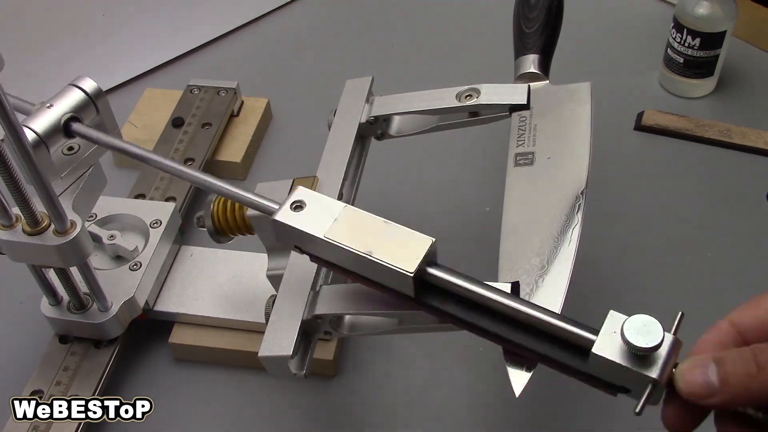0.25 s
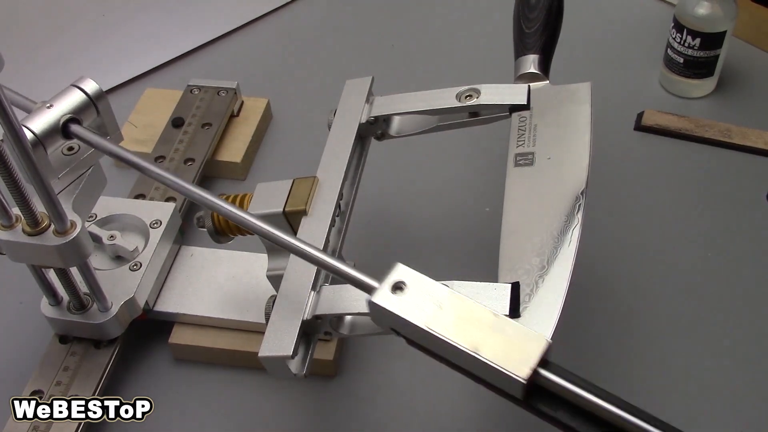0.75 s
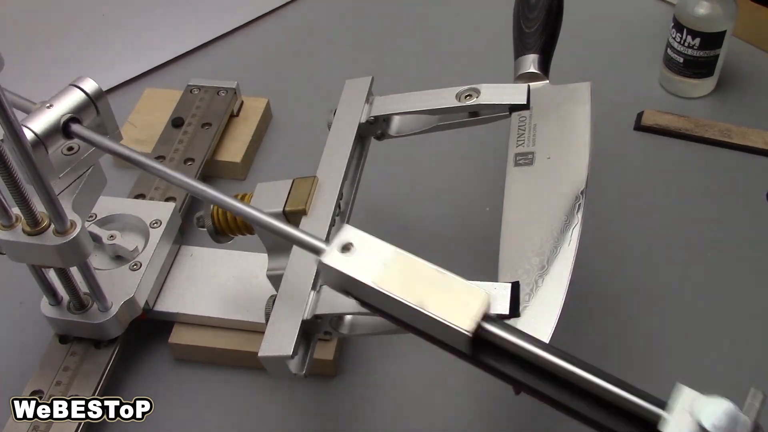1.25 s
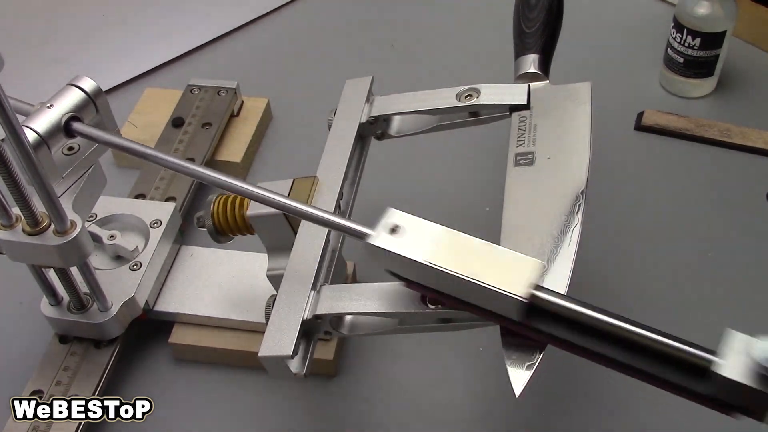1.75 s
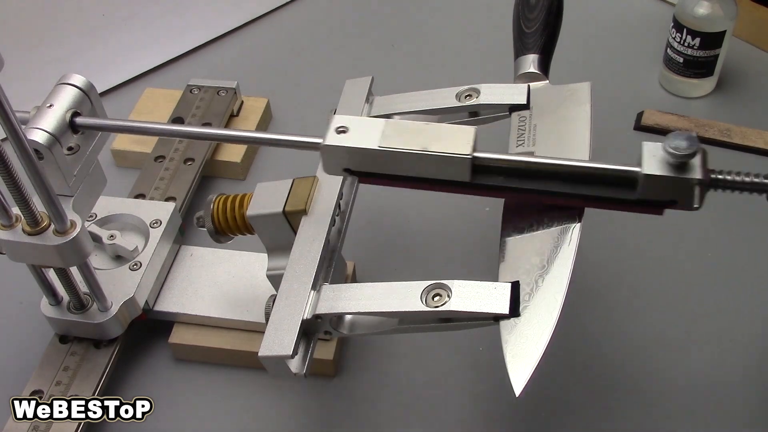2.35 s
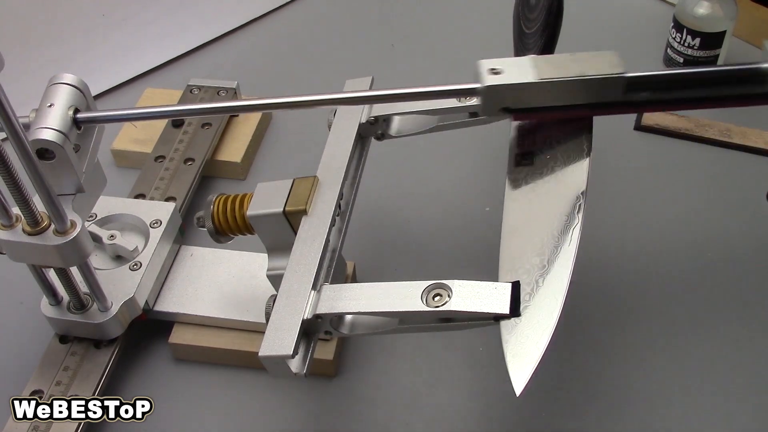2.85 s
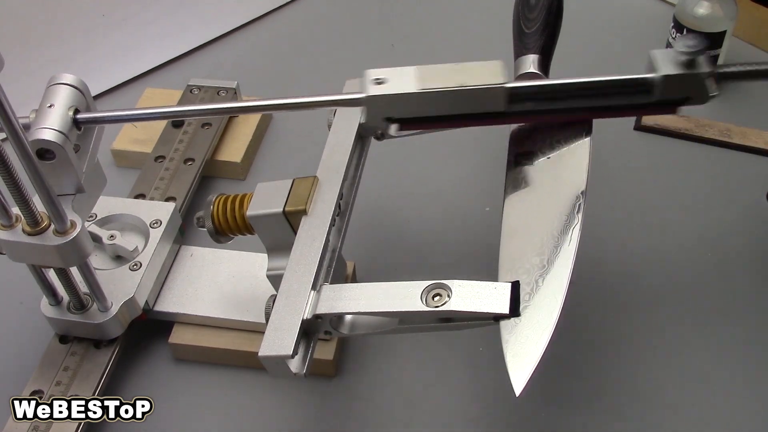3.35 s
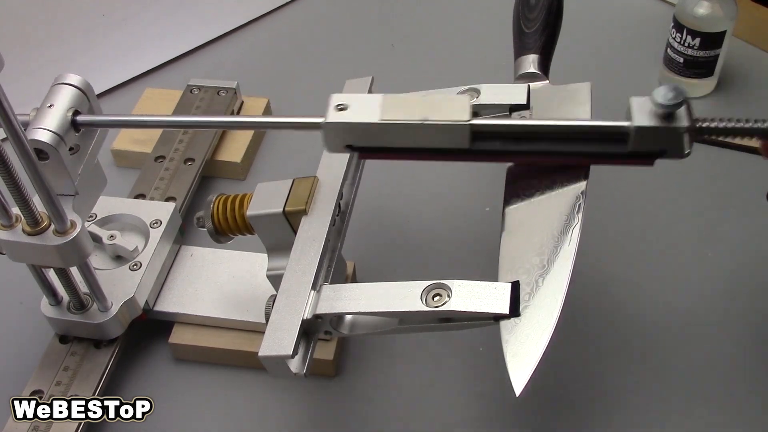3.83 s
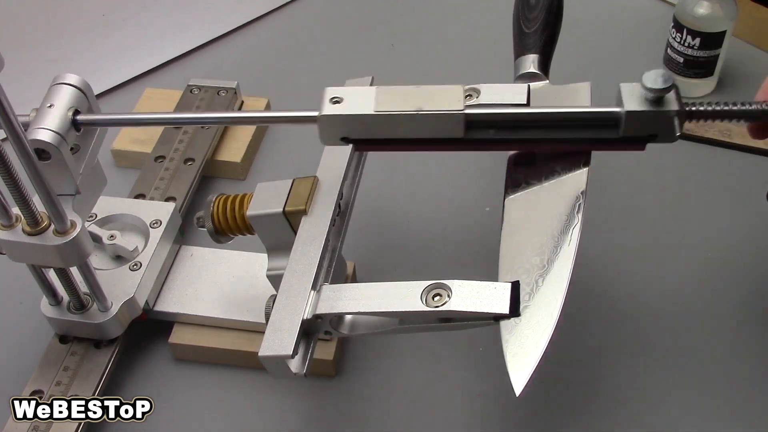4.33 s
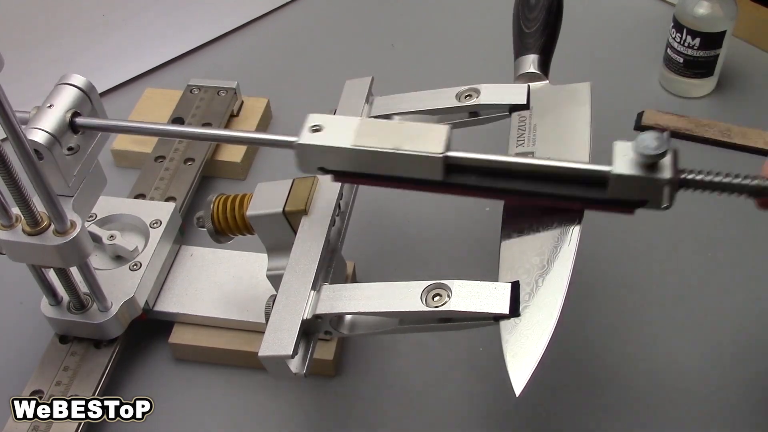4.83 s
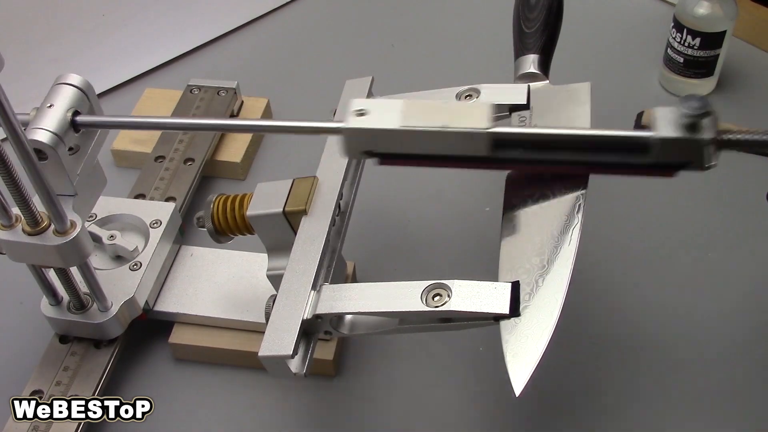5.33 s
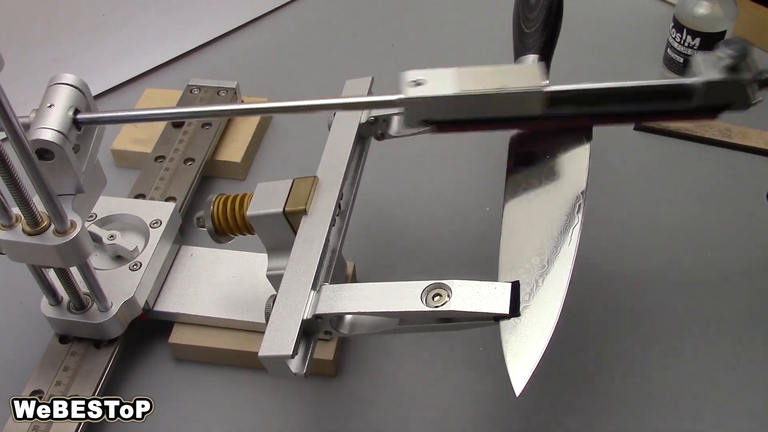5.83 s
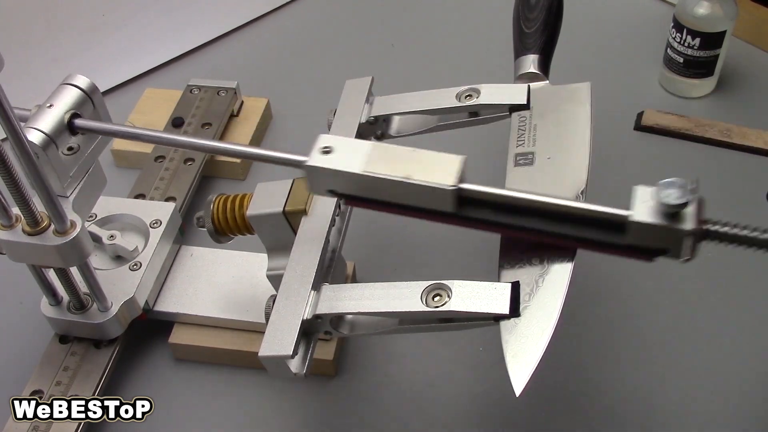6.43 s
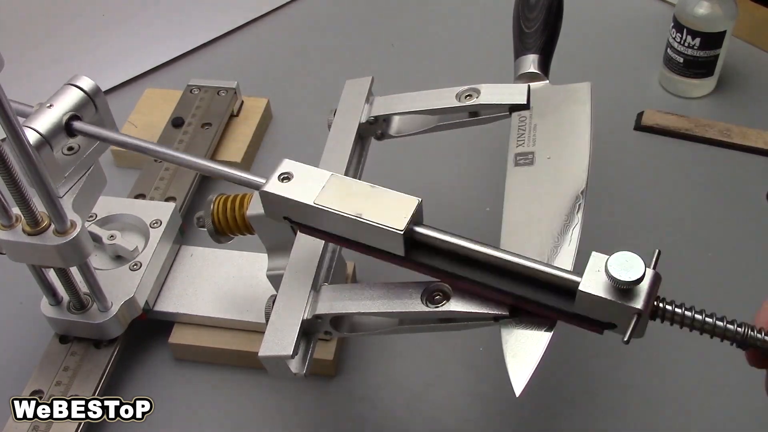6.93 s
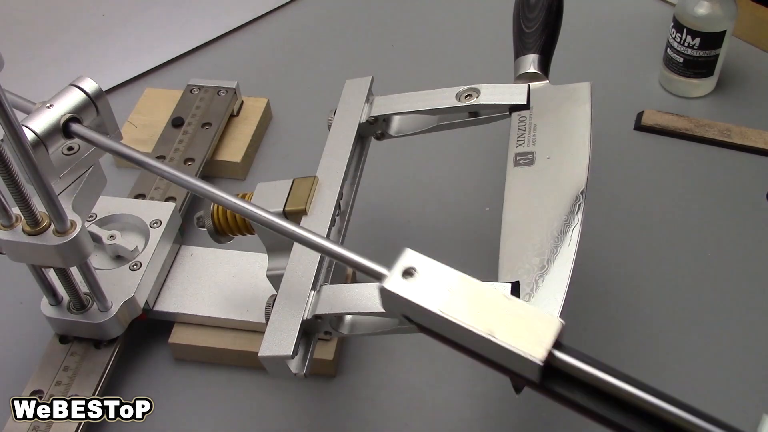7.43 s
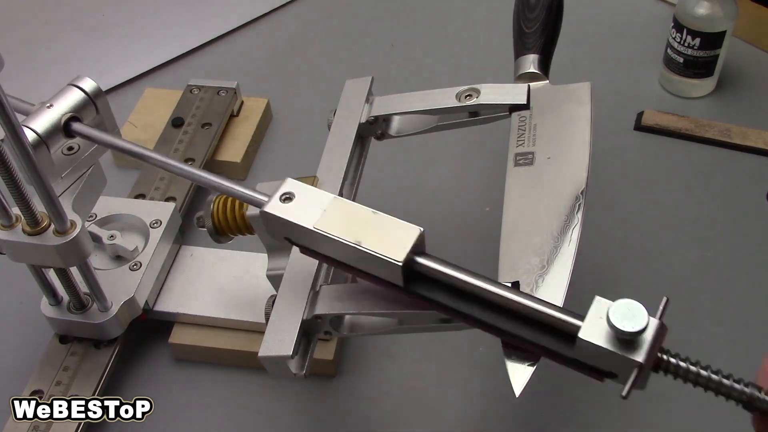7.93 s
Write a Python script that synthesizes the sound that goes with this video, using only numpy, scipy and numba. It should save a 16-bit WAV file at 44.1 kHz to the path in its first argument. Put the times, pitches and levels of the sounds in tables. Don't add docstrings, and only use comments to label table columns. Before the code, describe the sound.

Fast abrasive strokes on a knife blade, heard close and nearly dry. Each push and pull gives a short swell of sharp gritty hiss, the metal holder and clamp ringing underneath. After a tiny pause near the start the rubbing continues steadily to the end, changing from brighter and squealier to thinner tones as the stone wanders along the blade. Sharp little snags stand out, over faint room noise and tiny rapid ticks.

```python
import sys
import numpy as np
from scipy import signal
from scipy.fft import rfft, irfft, next_fast_len
from scipy.io import wavfile
from scipy.ndimage import uniform_filter1d
from numba import njit

SR = 44100
rng = np.random.default_rng(int(sys.argv[2]) if len(sys.argv) > 2 else 0)


def unload_wav(signal):
    wavfile.write(
        sys.argv[1],
        SR,
        np.round(np.clip(np.atleast_2d(signal).T, -1, 1) * 32767).astype(np.int16),
    )


def voltage_ratio(level):
    return 10 ** (np.asarray(level, float) / 20)


N = 360284
STEP = 32

# [t/s, peak level/dB, how far the stone is held back just before/dB]
CATCH_EVENTS = [(0.2675, -17, 2), (0.819, -26, 2), (0.98, -36, 0), (1.5877, -26, 5), (1.645, -30, 5),
                (1.935, -30, 4), (2.08, -21, 0), (2.2927, -30, 2), (2.378, -28, 6), (2.4294, -24, 3),
                (3.0904, -14.5, 6), (4.005, -28, 5), (5.696, -30, 5), (7.2489, -26, 6)]


def blade_hiss(rough):
    # [f/Hz, width/Hz, level/dB, gain toward the far end of the stone/dB]
    rod_modes = [(3250, 90, -9, 0), (3676, 31, 0, 0), (4890, 160, -3, 6), (4580, 2080, -7, 0)]
    squeal_mode = (4500, 130, 1.5, 0.4)
    holder_modes = [(6430, 230, 2, -6.5), (6896, 450, 0.5, -3), (8060, 1700, -6, 1.5)]
    blade_modes = [(9380, 400, 4.5, -5), (9940, 4900, -2, 0.5)]
    belly_mode = (10961, 289, 1, 2)
    edge_modes = [(14450, 410, 2, 0.36), (13700, 1200, -17, -1.4), (15300, 560, -9, 0)]

    top_s, rise, fall = humps(push=(.49, .355, .35), pull=(.53, .375, .335))
    edge_humps = humps(push=(.53, .22, .2), pull=(.46, .22, .24))
    squeal_db, belly_db, _, _ = along_knife()
    zing_db, zing_shift = zing()
    bite = catches()

    holder_db = answer(-8.1, 5.5, -2.5, 1.4) + .3 * np.interp(top_s, slow_time(), squeal_db)
    blade_db = answer()
    edge_db = answer(-3.3, 6.9, 1.0, 2.5)

    holder_force = rough * swells(top_s, rise, fall, holder_db, shape=3.2) + bite / 2
    holder = body(holder_force, holder_modes, wander_db=3.0, sag=0.018)

    blade_force = rough * swells(top_s, rise, fall, blade_db, shape=3.7) + bite
    blade = body(blade_force, [belly_mode, *blade_modes], wander_db=2.5, lifts_db=[belly_db])

    edge_force = rough * swells(*edge_humps, edge_db, shape=1.5) + bite / 2
    edge = body(edge_force, edge_modes, wander_db=4.0, sag=.045)

    drag = swells(top_s, 0.95 * rise, 0.95 * fall, (holder_db + blade_db) / 2 - 5, shape=2.23)
    rod = body(rough * drag + 0.33 * bite, [squeal_mode, *rod_modes], wander_db=3.5,
               lifts_db=[squeal_db + zing_db], sag=0.01, glide=.022 * travel() + zing_shift)
    return band(holder, 6420, 7600) + band(blade, 8000, 15000) + band(edge, 11500, 18500) + band(rod, 2540, 6700)


def zing():
    # [middle t/s, half length/s, level/dB, pitch shift/share]
    spells = [
        (2.03, .04, 8, .01),
        (2.45, .04, 3, .02),
        (3.2, .13, 8, .085),
        (5.08, .17, 5, .03),
        (6.12, .13, 4, .02),
        (7.04, .1, 4, .02),
    ]
    s, half, level_db, shift = np.transpose(spells)
    bell = np.exp(-((slow_time()[:, None] - s) / half) ** 4)
    return bell @ level_db, bell @ shift


def frame_hum(rough):
    # [f/Hz, width/Hz, level/dB, gain toward the far end of the stone/dB]
    base_modes = [(370, 30, -28, 0), (525.8, 41.4, 2, 1), (629, 19, -12, 3.5), (741, 15.5, -7, -5)]
    frame_modes = [(2343, 51, 1, 4.5), (795, 58, -6, 0), (1066, 37.5, 5, -6.5), (1130.4, 36, 0.5, -1),
                   (1317, 86, -2, -2.5), (1652, 130, -1, 2.5), (1821, 80, -3.5, 3), (2614, 56, -1, 1.5),
                   (2880, 21, -29, -4)]
    tipward_db = [-3, -8, 3, 3.5, 0, -3.5, 0, 3.5]

    _, _, sway_db, tip = along_knife()
    pushing = uniform_filter1d(np.sign(np.gradient(travel())), size=12)
    load_humps = humps(push=(.62, .33, .33), pull=(.44, .27, .49))
    sway_humps = humps(push=(.66, .3, .33), pull=(.42, .24, .42))

    force = rough * swells(*load_humps, answer(0.8, 5, 5.1, 2.8), shape=2.7)
    lifts_db = [gain_db * (tip - .4) for gain_db in tipward_db]
    lifts_db[0] = lifts_db[0] + 1.8 * pushing
    frame = body(force * voltage_ratio(-2.3) + 0.16 * catches(), frame_modes, wander_db=1.5, lifts_db=lifts_db, shared=True)

    sway = rough * swells(*sway_humps, answer(-0.2, 7, 8.5, 0.3), shape=2.7)
    sway = sway * fill(voltage_ratio(sway_db + 1.36 * pushing))
    base = body(sway, base_modes, wander_db=1.26, shared=True)

    frame = steadied(band(frame, 930, 3250), force, share=.6)
    base = steadied(band(band(base, 375, 1020), 252, 2100), sway, share=.7)
    return frame + base


def steadied(sound, force, share):
    heard, given = (uniform_filter1d(v ** 2 / np.mean(v ** 2), size=SR // 14) + .05 for v in (sound, force))
    return sound * (given / heard) ** (share / 2)


def grit():
    bites = (rng.random(N) < 60 / SR) * rng.uniform(.1, .7, N)
    start, length, _ = strokes()
    chance = rng.standard_normal((len(start), 2))
    grip_s = start + (.3 + .04 * chance[:, 0]) * length
    grips = np.clip(grip_s * SR, 0, N - 1).astype(int)
    bites[grips] = .6 * voltage_ratio(2.2 * chance[:, 1])
    ease_s = .004
    eased = signal.lfilter([1], [1, -np.exp(-1 / (ease_s * SR))], bites + 1e-18)
    rough = fill(voltage_ratio(.8 * drift(120))) * (1 + eased)
    return rough / np.sqrt(uniform_filter1d(rough ** 2, size=SR // 16))


def catches():
    kicks = np.zeros(N)
    for s, level_db, _ in CATCH_EVENTS:
        kicks[round(s * SR)] = voltage_ratio(level_db - 15)
    decay_s = 0.0019
    return signal.lfilter([1], [1, -np.exp(-1 / (decay_s * SR))], kicks + 1e-18)


def held_back():
    t, held_s = np.arange(N) / SR, .022
    return voltage_ratio(-sum(held_db * ((t > s - held_s) & (t < s)) for s, _, held_db in CATCH_EVENTS))


def strokes():
    turns_s = [-.022, .473, .851, .955, 1.04, 1.273, 1.554, 2.062, 3.205, 3.658, 4.558, 6.02, 6.817, 7.144,
               7.362, 8.19]
    strokes_done = [0, 9, 16, 16, 17, 20, 24, 31, 47, 53, 64, 81, 90, 94, 97, 109]
    number = np.arange(strokes_done[-1])
    start = np.interp(number + 1e-6, strokes_done, turns_s)
    end = np.interp(number + 1 - 1e-6, strokes_done, turns_s)
    return start, end - start, number % 2 - .5


def humps(push, pull):
    start, length, way = strokes()
    top, rise, fall = np.where(way > 0, np.transpose([push]), np.transpose([pull])) * length
    return start + top, rise, fall


def answer(offset_db=0, tip_db=0, push_heel_db=0, push_tip_db=0):
    # [t/s, pressure as blade level/dB, push over pull/dB]
    hand = [(0.0, -39.4, 0.4), (0.3, -36.6, 0.3), (0.75, -38.9, -1.3), (0.83, -43.3, -1.4),
            (1.0, -46.3, 0.9), (1.1, -41.5, -3.2), (1.95, -40.8, 1.5), (2.1, -42.7, -6.4),
            (2.25, -43.8, -6.4), (2.45, -40.9, -1.7), (2.8, -40.0, -3.5), (3.2, -40.4, -0.1),
            (3.8, -38.9, -1.5), (4.8, -40.7, -0.6), (6.0, -40.1, -0.8), (6.75, -43.7, -0.0),
            (7.1, -42.1, 0.8), (8.17, -42.2, -1.9)]
    # [t/s, level/dB]
    odd_strokes = [
        (.33, 2.5),
        (1.66, 2.5),
        (1.73, -3),
        (1.81, -2.5),
        (1.88, 1.5),
        (5.46, 1.8),
        (7.74, -2.5),
    ]
    start, length, way = strokes()
    s, pressure_db, push_db = np.transpose(hand)
    middle = start + length / 2
    tip = np.interp(middle, slow_time(), along_knife()[3])
    effort_db = np.interp(middle, s, pressure_db)
    lean_db = np.interp(middle, s, push_db) + push_heel_db + (push_tip_db - push_heel_db) * tip
    odd_db = sum(level_db * (abs(middle - at) < length / 2) for at, level_db in odd_strokes)
    uneven_db = .4 * rng.standard_normal(len(way))
    return effort_db + odd_db + offset_db + tip_db * tip + way * lean_db + uneven_db


def travel():
    start, length, way = strokes()
    times = np.c_[start, start + .999 * length].ravel()
    return np.interp(slow_time(), times, np.c_[-2 * way, 2 * way].ravel())


def along_knife():
    # [t/s, rod squeal/dB, belly mode/dB, base sway against frame/dB, place/heel 0 to tip 1]
    place = [
        (0.0, -5.2, -8.0, -7.3, 0.5),
        (1.0, -4.9, -8.0, -4.7, 0.9),
        (1.9, 1.7, 2.0, -11.4, 0.58),
        (2.4, 7.2, 4.5, -9.7, 0.0),
        (3.4, -3.9, -1.0, -8.9, 0.15),
        (4.6, 2.1, 4.5, -9.7, 0.08),
        (5.8, 3.0, 4.5, -11.3, 0.3),
        (6.8, 6.5, 4.5, -8.5, 0.38),
        (7.3, 4.3, -2.0, -8.6, 0.72),
        (8.17, -11.1, -7.0, -5.4, 1.04),
    ]
    s, *columns = np.transpose(place)
    return [np.interp(slow_time(), s, c) for c in columns]


def swells(times, rises, falls, levels_db, shape):
    t = slow_time()[:, None] - times
    fade_db = np.minimum(10 * np.abs(t / np.where(t < 0, rises, falls)) ** shape, 120)
    return fill(np.sqrt(np.sum(voltage_ratio(levels_db - fade_db) ** 2, axis=1)))


def body(force, modes, wander_db, lifts_db=(), sag=0, glide=0, shared=False):
    out, lifts_db, place = 0, list(lifts_db) + [0] * len(modes), travel()
    noise = rng.standard_normal(N)
    for (hz, width_hz, level_db, tilt_db), lift_db in zip(modes, lifts_db):
        if not shared:
            noise = np.roll(noise, SR // 3)
        gain = fill(voltage_ratio(level_db + lift_db + tilt_db * place + wander_db * flutter(30)))
        out = out + mode(force * gain * noise, hz * (1 - sag * place ** 2 + glide), width_hz)
        glide = 0
    return out / np.sqrt(sum(voltage_ratio(m[2]) ** 2 * np.pi * m[1] / SR for m in modes))


def mode(x, hz, width_hz):
    return resonate(x, fill(np.cos(2 * np.pi * hz / SR) + 0 * slow_time()), np.exp(-np.pi * width_hz / SR))


@njit
def resonate(x, turn, r):
    y = np.zeros(len(x))
    for i in range(2, len(x)):
        y[i] = (1 - r * r) / 2 * (x[i] - x[i - 2]) + 2 * r * turn[i] * y[i - 1] - r * r * y[i - 2]
    return y


def band(x, low_hz, high_hz):
    return signal.sosfilt(signal.butter(2, [low_hz, min(high_hz, 20000)], "band", fs=SR, output="sos"), x)


def drift(rate_hz):
    r = np.exp(-2 * np.pi * STEP * rate_hz / SR)
    noise = rng.standard_normal(len(slow_time()) + 300)
    slow = signal.lfilter([1], [1, -2 * r, r * r], noise)[300:]
    return slow / slow.std()


def flutter(rate_hz):
    slow = drift(rate_hz)
    return slow - uniform_filter1d(slow, size=110)


def slow_time():
    return np.arange(N // STEP + 2) * STEP / SR


def fill(control):
    return np.interp(np.arange(N) / STEP, np.arange(len(control)), control)


def room(x):
    size = next_fast_len(N + SR)
    hz = np.arange(size // 2 + 1) * SR / size
    t60_s = 0.16 / np.sqrt(1 + (hz / 5000) ** 2)
    loops = [voltage_ratio(-60 * lag / t60_s) * np.exp(-2j * np.pi * hz * lag) for lag in rng.uniform(.011, .031, 8)]
    return irfft(rfft(x, size) * sum(g / (1 - g) for g in loops), size)[:N]


def ticking():
    groups_s = np.arange(.0167, N / SR - .04, .0447)
    at = groups_s[:, None] + [0, .0097, .02, .03]
    clicks = np.full(N, 1e-18)
    clicks[(at.ravel() * SR).astype(int)] = voltage_ratio(-24 + 2.2 * rng.standard_normal(at.size))
    hz, width_hz = 9100, 700
    return mode(mode(clicks, hz, width_hz), hz, width_hz)


def hush():
    # [f/Hz, level per Hz/dB]
    spectrum = [(30, -25.5), (200, -21.5), (450, -2.5), (1100, -4), (2060, 0), (3000, -7), (8000, -14),
                (15500, -21)]
    hz, level_db = np.transpose(spectrum)
    grid = np.maximum(np.arange(N // 2 + 1) * SR / N, 1)
    colour = voltage_ratio(np.interp(np.log(grid), np.log(hz), level_db))
    noise = irfft(rfft(rng.standard_normal(N)) * colour, N)
    return voltage_ratio(-54) * noise / noise.std()


def scene():
    rough = grit() * held_back()
    jig = blade_hiss(rough) + frame_hum(rough)
    return (jig + voltage_ratio(-21) * room(jig) + ticking() + hush())[None]


def band_limit(x):
    return signal.sosfilt(signal.butter(12, 16390, fs=SR, output="sos"), x)


def record(dry):
    cut = signal.sosfilt(signal.cheby2(16, 50, 16020, fs=SR, output="sos"), dry)
    return band_limit(cut)


dry = scene()
out = record(dry)
unload_wav(out)
```